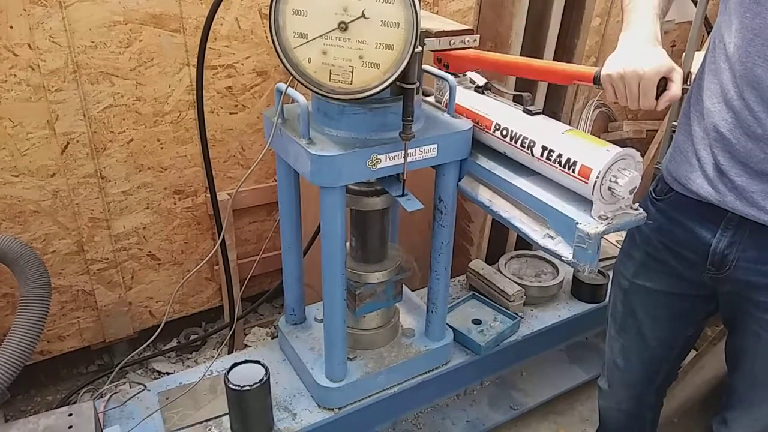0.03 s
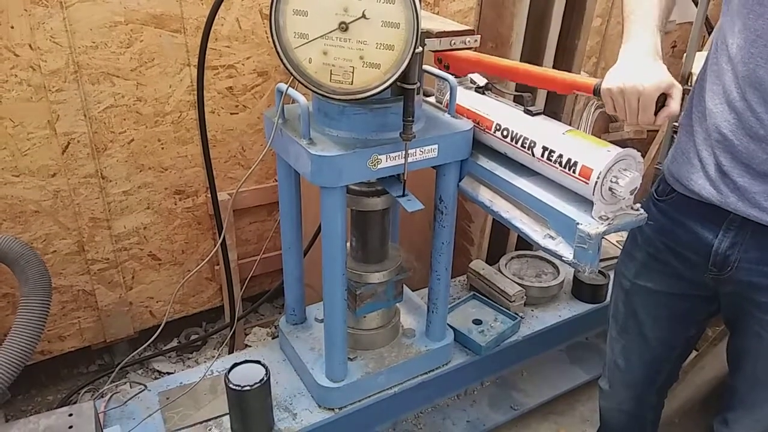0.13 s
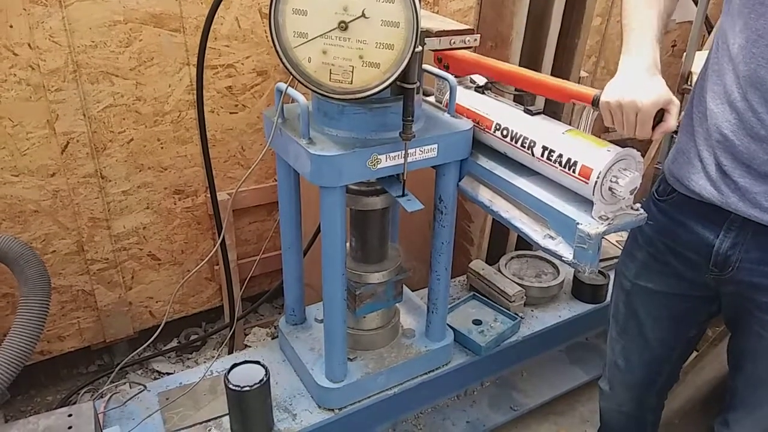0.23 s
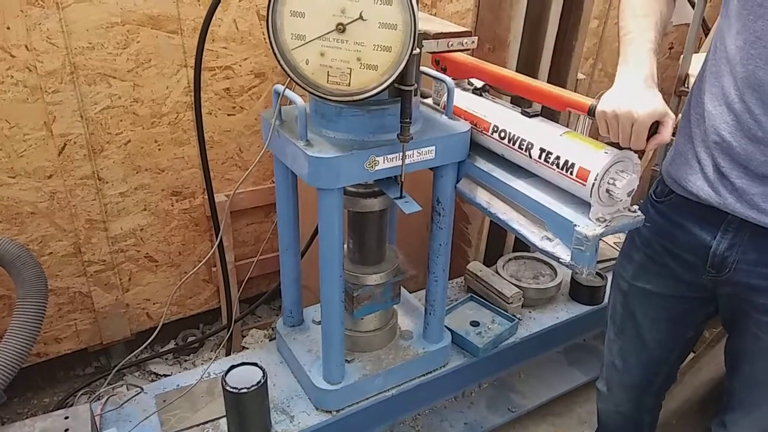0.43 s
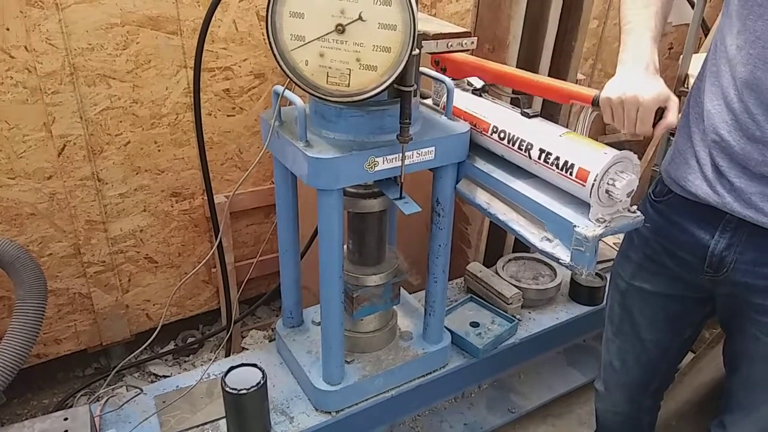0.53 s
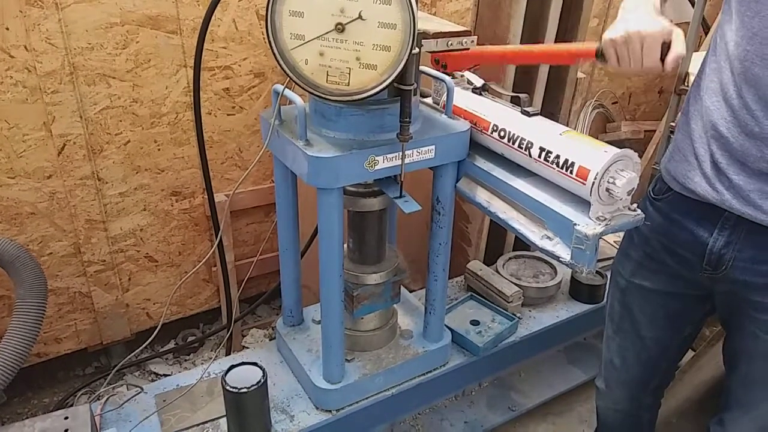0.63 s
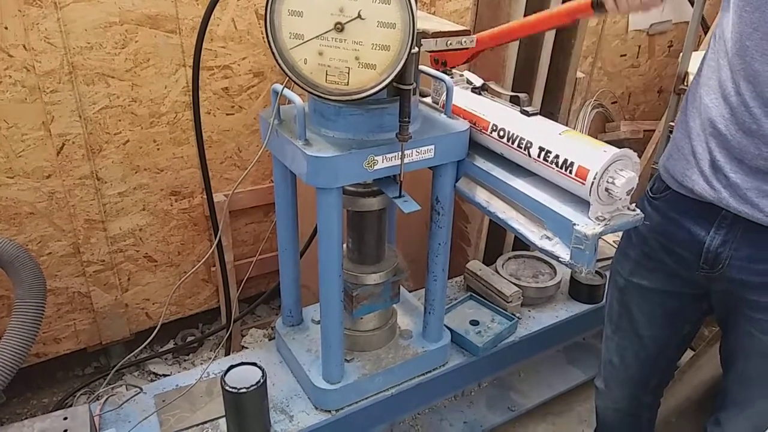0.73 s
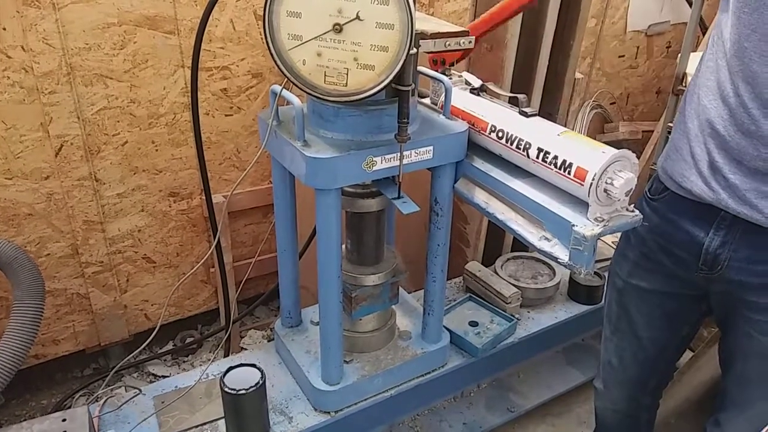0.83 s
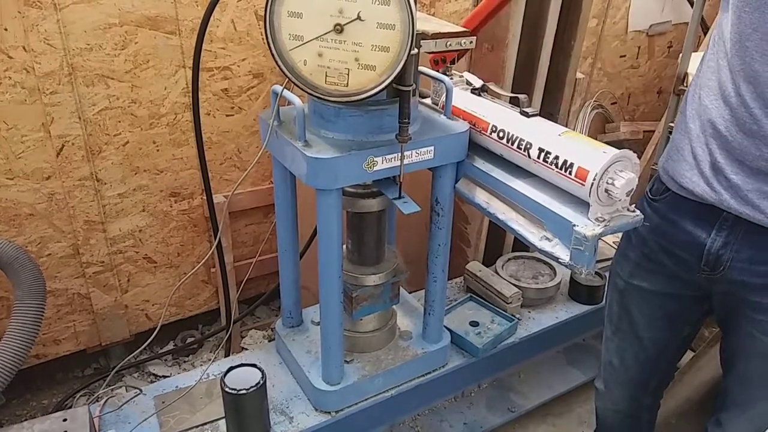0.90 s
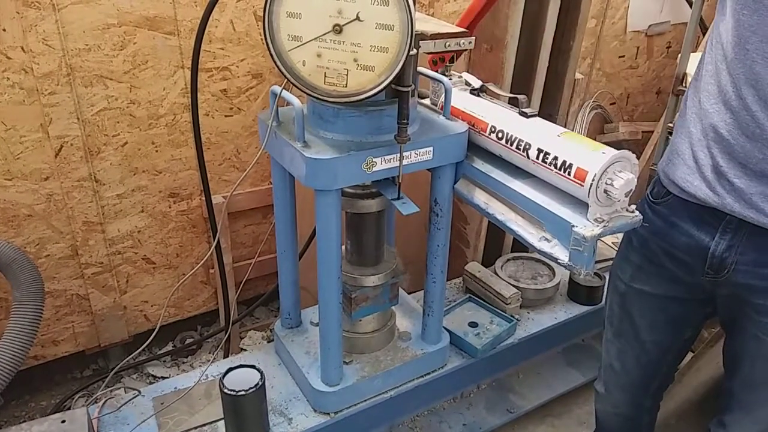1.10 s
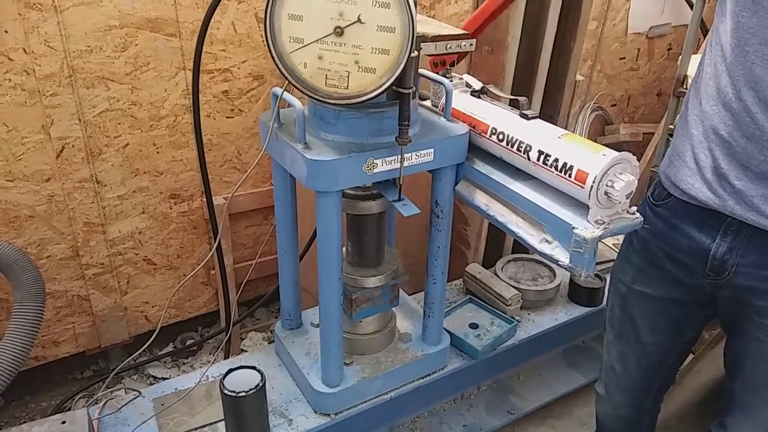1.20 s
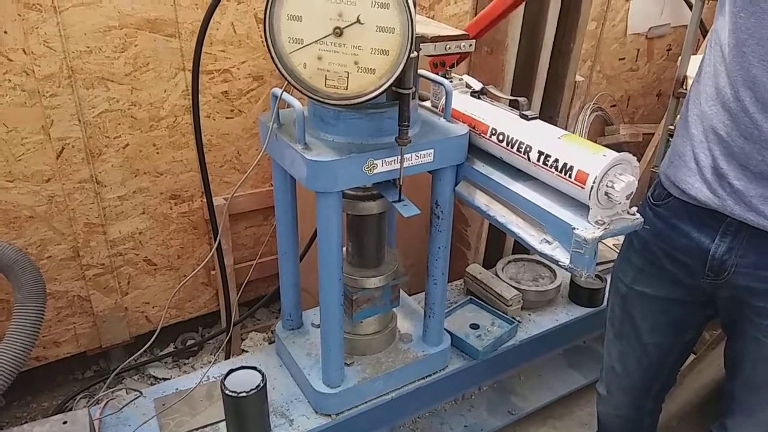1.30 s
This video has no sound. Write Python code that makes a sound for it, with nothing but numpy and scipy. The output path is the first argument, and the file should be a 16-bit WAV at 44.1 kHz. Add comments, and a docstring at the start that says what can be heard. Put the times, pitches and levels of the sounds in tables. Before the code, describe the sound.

A sharp bang as something brittle bursts in a press, then a pump handle clacks.

```python
"""A brittle sample bursts with a bang under a hand-pumped hydraulic press in a small workshop.
Small cracks tick first; then the fracture releases the stored elastic energy, rings the steel and
overloads the microphone. The bang echoes off a wall, fragments fall, and the pump handle rubs,
knocks and clacks at its stop. Ventilation hums underneath, with a faint whine."""
import sys
import numpy as np
from scipy import signal
from scipy.fft import rfft, irfft
from scipy.io import wavfile
from scipy.ndimage import uniform_filter1d

SR = 44100
rng = np.random.default_rng(int(sys.argv[2]) if len(sys.argv) > 2 else 0)


def dump(signal):
    """Clip the signal to [-1, 1] and save it as 16-bit WAV at the path in sys.argv[1]."""
    limited = np.clip(np.atleast_2d(signal).T, -1, 1)
    pcm = np.round(limited * 32767).astype(np.int16)
    wavfile.write(sys.argv[1], SR, pcm)


N = 59535
TIME = np.arange(N) / SR
FREQS = np.fft.rfftfreq(N, 1 / SR)


def amp(db):
    """Amplitude ratio of a level in decibels."""
    return 10 ** (np.asarray(db) / 20)


def unit(x):
    """Normalisation to an rms of 1."""
    return x / np.sqrt(np.mean(abs(x) ** 2) + 1e-20)


def read(points, hz):
    """Interpolation of a table on a logarithmic frequency axis."""
    frequency_hz, value = np.transpose(points)
    return np.interp(np.log(hz + 1), np.log(frequency_hz), value)


def delayed(x, start_s):
    """Time delay: the sound begins at start_s."""
    return np.concatenate([np.zeros(max(round(start_s * SR), 0)), x])[:N]


def noise(spectrum, tilt_db_per_octave=0):
    """Spectral shaping: white noise takes a given spectrum, tilted above 200 Hz, at an rms of 1."""
    gain = amp(read(spectrum, FREQS) + tilt_db_per_octave * np.log2(np.maximum(FREQS, 200)))
    return unit(irfft(rfft(rng.standard_normal(N)) * gain, N))


def drift(rate_hz):
    """Low-pass noise: a slow random fluctuation with an rms of 1."""
    return unit(irfft(rfft(rng.standard_normal(N)) * np.exp(-(FREQS / rate_hz) ** 2), N))


def fade(t60_s, rise_s=1e-4):
    """Exponential damping after a linear rise: the level falls 60 dB in t60_s."""
    return np.minimum(TIME / rise_s, 1) * amp(-60 * TIME / t60_s)


def ring(modes):
    """Free vibration of struck metal: a sum of damped normal modes in random phase."""
    return sum(amp(level_db) * fade(t60_s) * np.sin(2 * np.pi * (pitch_hz * TIME + rng.random()))
               for pitch_hz, level_db, t60_s in modes)


def room(x, rise_s=0.011):
    """Reverberation: steady noise becomes a diffuse tail in which each band decays at its own rate."""
    # reverberation time of the workshop: frequency_hz, t60_s
    decay_times = [(100, 0.43), (1000, 0.44), (3000, 0.72), (6500, 0.61), (9000, 0.51), (15000, 0.36)]
    hz, t, bands = signal.stft(x, SR, nperseg=256)
    decay = amp(-60 * t / read(decay_times, hz)[:, None])
    tail = signal.istft(bands * decay, SR, nperseg=256)[1]
    return tail[:N] * np.minimum(TIME / rise_s, 1)


def ventilation(hum_width_hz=10.3):
    """Broadband air noise, gently uneven, over a hum whose lines are widened by random modulation."""
    # air noise: frequency_hz, density_db
    air_spectrum = [(25, -22), (42, -29), (62, 5), (80, -10), (150, -1), (260, -4), (380, -2.5),
                    (560, -7.5), (1100, -6.5), (1900, -8), (3500, -12.5), (6800, -13.5), (8700, -26.5),
                    (12000, -29.5), (16000, -37)]
    # hum lines: pitch_hz, level_db
    hum_lines = [(104, -46), (245, -47), (334, -49)]
    bands = signal.stft(noise(air_spectrum), nperseg=1024)[2]
    # the level varies by 1.5 dB rms in patches of frequency and time
    patches = uniform_filter1d(rng.standard_normal(bands.shape), size=14, axis=0)
    patches = unit(uniform_filter1d(patches, size=7, axis=1))
    air = signal.istft(bands * amp(1.5 * patches), nperseg=1024)[1][:N]
    out = amp(-35) * unit(air)
    for pitch_hz, level_db in hum_lines:
        modulation = drift(hum_width_hz) + 1j * drift(hum_width_hz)
        carrier = np.exp(2j * np.pi * pitch_hz * TIME)
        out += amp(level_db) * unit((modulation * carrier).real)
    return out


def whine(pitch_hz=1082, wander_hz=3):
    """Random frequency modulation makes a thin tone waver as it swells and fades."""
    # envelope of the tone: time_s, level_db
    envelope = [(0, -48), (0.09, -43.5), (0.22, -54), (0.46, -49.5), (0.62, -39), (0.72, -47.5),
                (0.85, -43.5), (0.95, -72), (1.35, -67)]
    hz = pitch_hz + wander_hz * drift(rate_hz=21)
    tone = unit(np.sin(2 * np.pi * np.cumsum(hz) / SR))
    return amp(np.interp(TIME, *np.transpose(envelope))) * tone


def handle_rub(peak_s=1.012, width_s=0.013):
    """Sliding friction in the pivot gives a soft swell of noise as the pump handle swings up."""
    # friction noise: frequency_hz, density_db
    spectrum = [(700, -2), (1550, 0), (1900, -8), (2500, -2), (4000, -6), (5000, -5), (9000, -20),
                (16000, -35)]
    return amp(-33) * noise(spectrum) * np.exp(-((TIME - peak_s) / width_s) ** 2 / 2)


def handle_knocks():
    """Impact excitation: dull knocks of the handle drive the damped modes of its pivot."""
    # knocks: start_s, level_db, tilt_db_per_octave
    knocks = [(1.1655, -26, 3), (1.1710, -14.5, -1), (1.179, -18.5, -4)]
    # contact noise: frequency_hz, density_db
    spectrum = [(100, -15), (500, -26), (900, -10), (1700, -14), (2200, 0.5), (2800, -11.5), (3800, -7.5),
                (5000, -19), (16000, -41)]
    # pivot modes: pitch_hz, level_db, t60_s
    pivot_modes = [(1310, -14.5, 0.15), (2000, -6, 0.052), (2185, -7, 0.069), (2304, -10, 0.073)]
    out = np.zeros(N)
    for start_s, level_db, tilt in knocks:
        hit = noise(spectrum, tilt) * fade(t60_s=0.031, rise_s=0.0013) + ring(pivot_modes)
        tail = amp(-20) * room(noise(spectrum, tilt))
        out += amp(level_db) * delayed(hit + tail, start_s)
    return out


def handle_clacks():
    """Hard contact at the stop excites the linkage's high modes, whose band lingers in the room."""
    # clacks: start_s, level_db
    clacks = [(1.1848, -39), (1.1890, -22), (1.1935, -17.5)]
    # contact noise: frequency_hz, density_db
    spectrum = [(60, -13), (220, 8), (600, -4), (1250, 1), (2000, -1.5), (4500, -1), (7000, -7),
                (11000, -11), (16000, -22)]
    # linkage modes: pitch_hz, level_db, t60_s
    linkage_modes = [(5675, -2.5, 0.049), (5910, 0, 0.047), (6380, -7, 0.028)]
    # reverberation of those modes: frequency_hz, density_db
    ringing_spectrum = [(4500, -40), (5400, -8), (5700, 0), (6100, -5), (6500, -6), (7500, -40)]
    out = np.zeros(N)
    for start_s, level_db in clacks:
        hit = noise(spectrum) * fade(t60_s=0.06, rise_s=0.00076) + ring(linkage_modes)
        tail = room(amp(-18.5) * noise(spectrum) + amp(-19.5) * noise(ringing_spectrum))
        out += amp(level_db) * delayed(hit + tail, start_s)
    return out


def fragments_and_echo():
    """Impact and reflection: falling pieces and the bang's echo off a wall give short sharp transients."""
    # transients: start_s, level_db, tilt_db_per_octave
    transients = [(0.2506, -9, 0), (0.283, -19.5, -1.5), (0.2935, -7.5, 6.5), (0.320, -10.5, 8),
                  (0.352, -17.5, -1), (0.447, -40, 4)]
    # their noise: frequency_hz, density_db
    spectrum = [(80, -16), (300, -19), (1100, -3.5), (2000, -9.5), (2700, 1), (6000, -5.5), (9000, -17.5),
                (16000, -36)]
    envelope = fade(t60_s=0.082, rise_s=0.001)
    return sum(amp(level_db) * delayed(noise(spectrum, tilt) * envelope, start_s)
               for start_s, level_db, tilt in transients)


def ticks():
    """Acoustic emission: each small crack snaps, rings the platen and echoes in the press and room."""
    # cracks: start_s, level_db, tilt_db_per_octave, relative_snap_db
    cracks = [(0.001, -26, -4, -4), (0.0246, -21, 2.5, -4), (0.0823, -25.5, -2.5, -5), (0.0987, -21, 2, 5),
              (0.1150, -27, -2, 4), (0.1584, -22, -3, -6), (0.1875, -37, -3, 5), (0.2109, -19, 3, 1),
              (0.2265, -29, -5.5, -7), (1.026, -38.5, -4, -8), (1.268, -37, 0, -1),
              (1.3134, -34, 1.5, -1.5)]
    # crack noise: frequency_hz, density_db
    spectrum = [(500, -18), (2800, -5.5), (3900, -5.5), (5200, 3.5), (7500, 5), (10000, -3.5),
                (12000, -3.5), (13500, -9), (16000, -9.5)]
    # ram and platen modes: pitch_hz, level_db, t60_s
    platen_modes = [(3840, -2.5, 0.089), (4840, -2.5, 0.11), (5420, -1.5, .18), (6500, -9, .1),
                    (6440, -6, 0.29), (7600, 1, 0.06), (8780, 1.5, .07), (11920, 3.5, 0.035)]
    snap_envelope = amp(-1) * fade(t60_s=0.0072) + fade(t60_s=0.066)  # a click and a slower decay
    out = np.zeros(N)
    for start_s, level_db, tilt, relative_snap_db in cracks:
        snap = amp(relative_snap_db - 2) * noise(spectrum, tilt) * snap_envelope
        platen = amp(-9.5) * ring(platen_modes)
        echo = amp(0.5) * delayed(noise(spectrum, tilt) * fade(t60_s=0.068), start_s=0.0037)
        tail = amp(-13) * room(noise(spectrum, tilt))
        out += amp(level_db) * delayed(snap + platen + echo + tail, start_s)
    return out


def bang(start_s=0.2371):
    """Brittle fracture frees elastic energy as a bright snap and a broad blast; steel and room ring on."""
    # snap: frequency_hz, density_db
    snap_spectrum = [(1000, -33), (5000, -13), (8500, 1), (12000, -5.5), (16000, -14)]
    # broad, bright blast with a weak low end: frequency_hz, density_db
    blast_spectrum = [(30, -25), (90, -16), (300, -20), (750, -17.5), (1700, -16.5), (2500, 2.5),
                      (3300, -6), (4500, -3.5), (6700, 3), (8500, -5.5), (16000, -16)]
    # modes of the steel press: pitch_hz, level_db, t60_s
    steel_modes = [(2428, -6, .55), (2497, -5, .6), (2751, -2, .6), (3251, -6, .55), (3721, -4, .5),
                   (3995, -4, .55), (4714, 0, .7), (4818, -2, .55), (4997, -4, .65), (5371, -3, .7),
                   (5739, -2, .55), (6125, -3, .5), (6735, -2, .55), (6833, -1, .6)]
    # reverberation of the bang: frequency_hz, density_db
    tail_spectrum = [(60, -16), (250, -8.5), (550, -27), (1200, -16), (1900, -15.5), (2550, -5),
                     (3100, -10.5), (4200, -3), (4800, 0), (6900, 2), (7700, -3), (10000, -8.5),
                     (16000, -16.5)]
    snap = amp(2) * noise(snap_spectrum) * fade(t60_s=0.037)
    blast = amp(2.5) * noise(blast_spectrum) * fade(t60_s=0.11, rise_s=0.0046)
    steel = amp(-19.5) * ring(steel_modes)
    tail = amp(-4) * room(noise(tail_spectrum))
    return delayed(snap + blast + steel + tail, start_s)


def scene():
    """Superposition of all sources, equal in both channels and so heard in the centre."""
    mono = ventilation() + whine() + ticks() + bang() + fragments_and_echo()
    mono += handle_rub() + handle_knocks() + handle_clacks()
    return np.array([mono, mono])


def record(dry, clip_level=0.91, knee=2.8, low_cut_hz=42, high_cut_hz=15950):
    """Soft saturation: the microphone flattens the bang's peaks and passes a limited band."""
    clipped = dry / (1 + abs(dry / clip_level) ** knee) ** (1 / knee)
    high_pass = 1 - 1 / (1 + (FREQS / low_cut_hz) ** 4)
    thinned = irfft(rfft(clipped) * high_pass, N)
    low_pass = signal.firwin(511, high_cut_hz, window=("kaiser", 9), fs=SR)
    return signal.oaconvolve(thinned, low_pass[None], "same")


dry = scene()
out = record(dry)
dump(out)
```